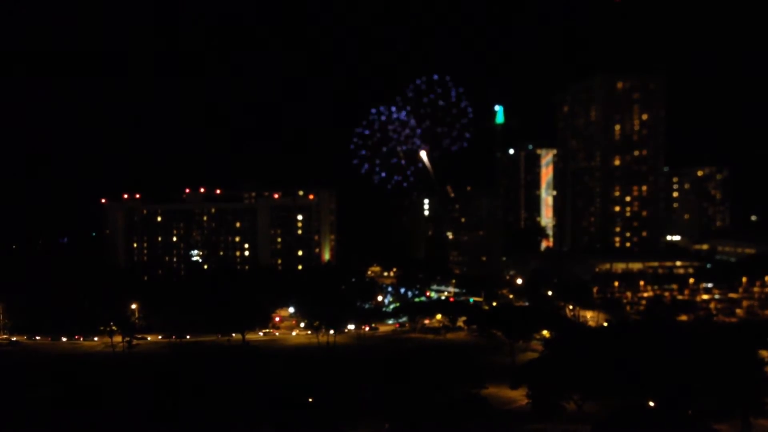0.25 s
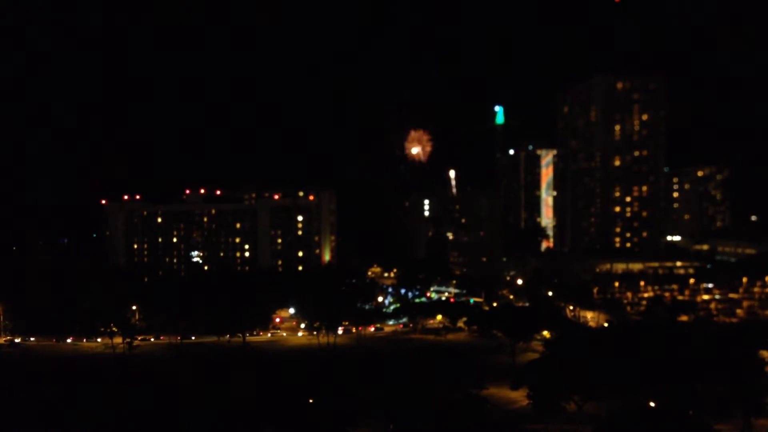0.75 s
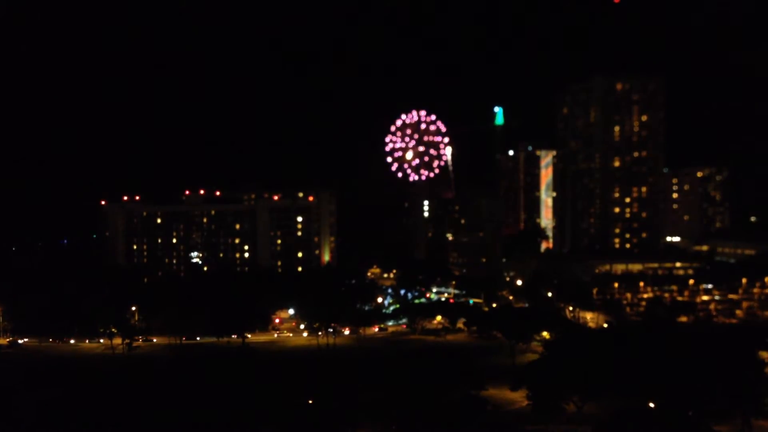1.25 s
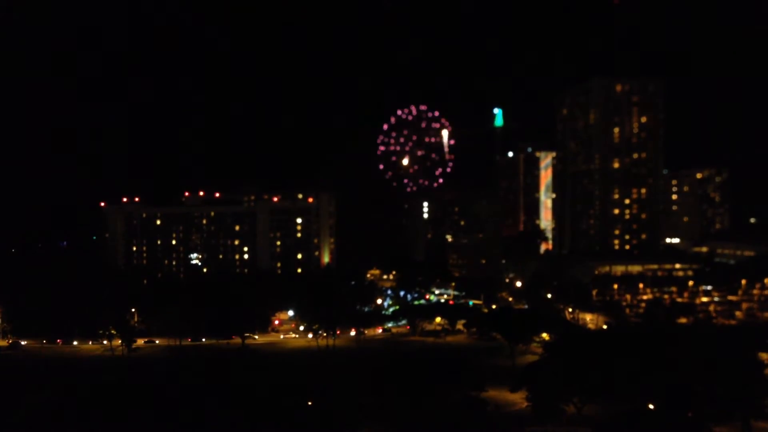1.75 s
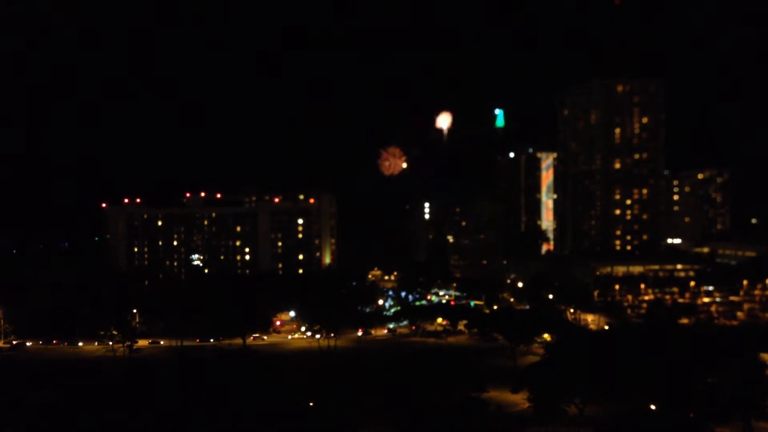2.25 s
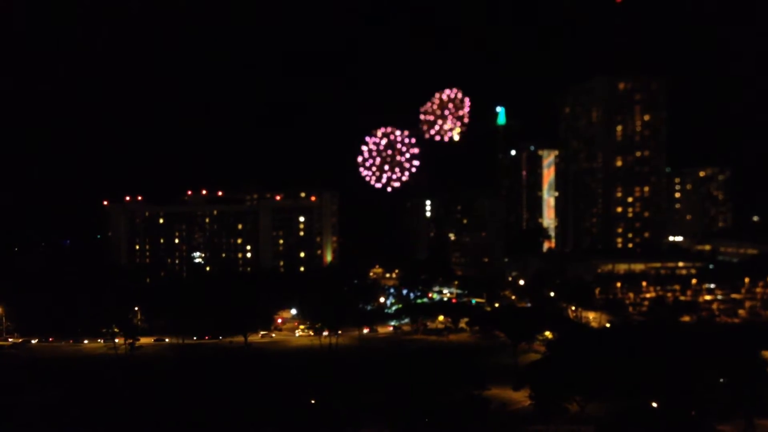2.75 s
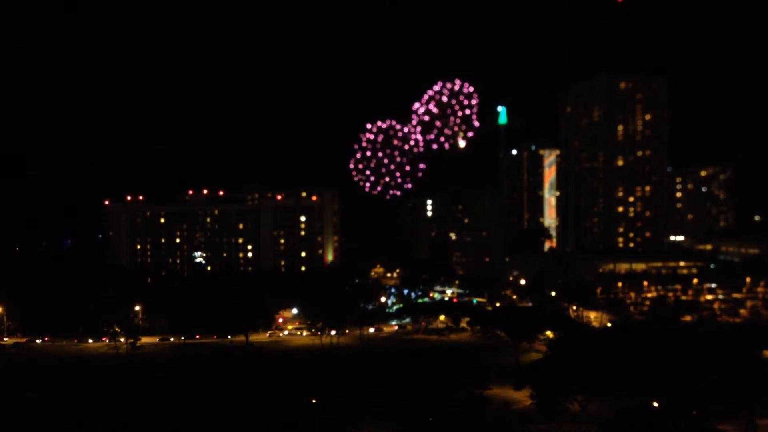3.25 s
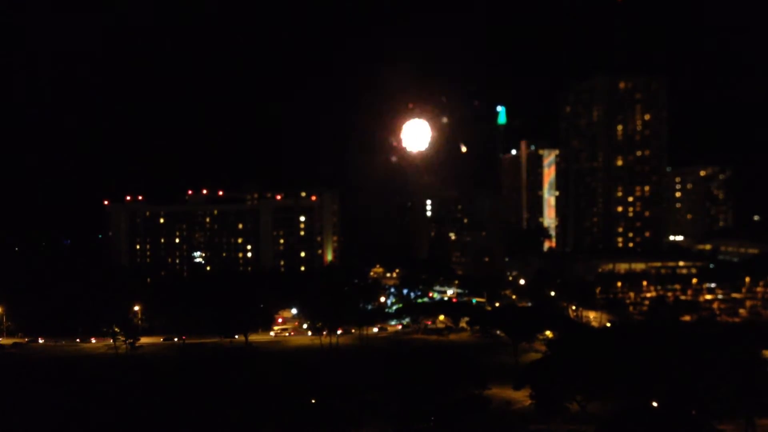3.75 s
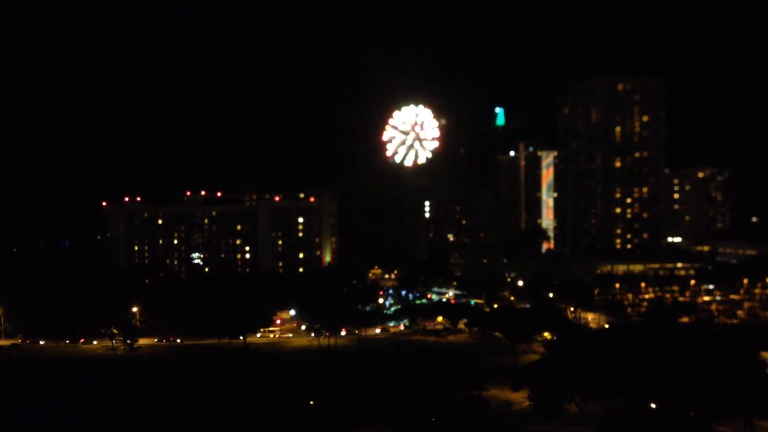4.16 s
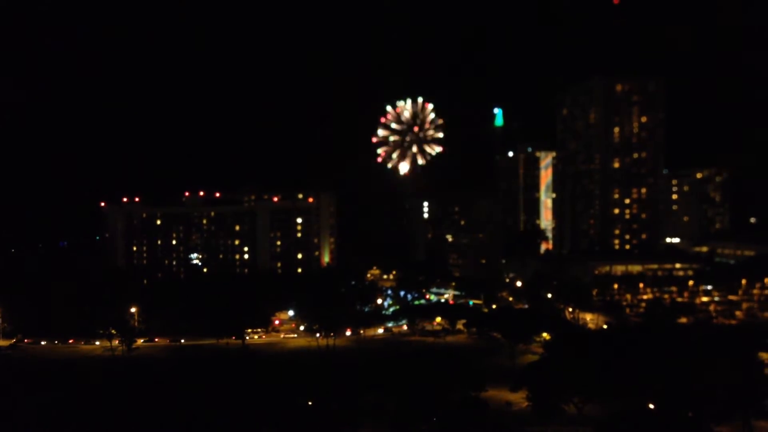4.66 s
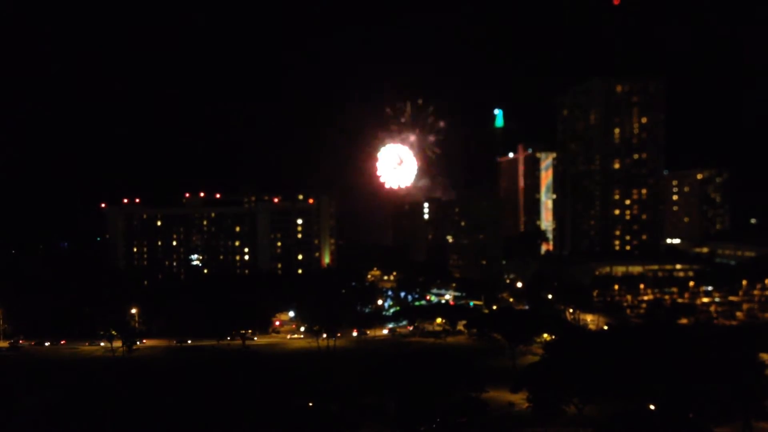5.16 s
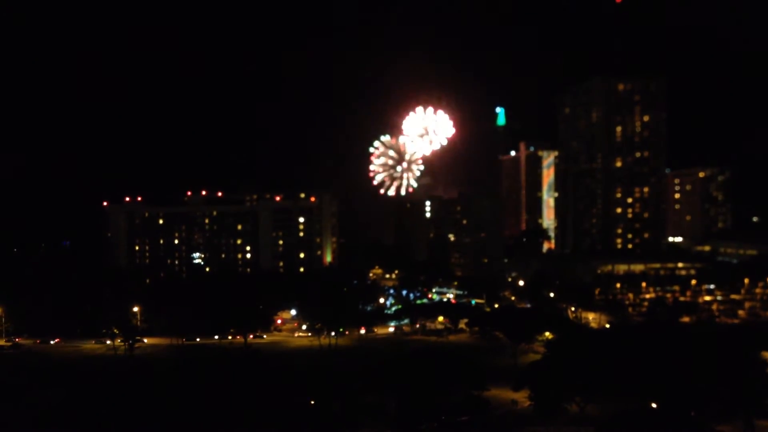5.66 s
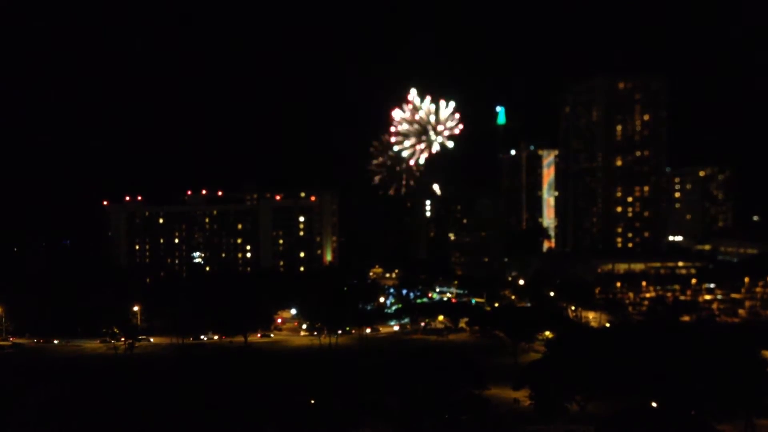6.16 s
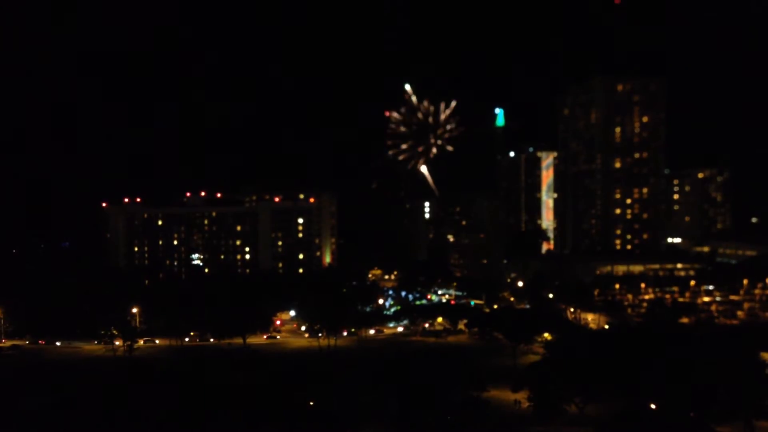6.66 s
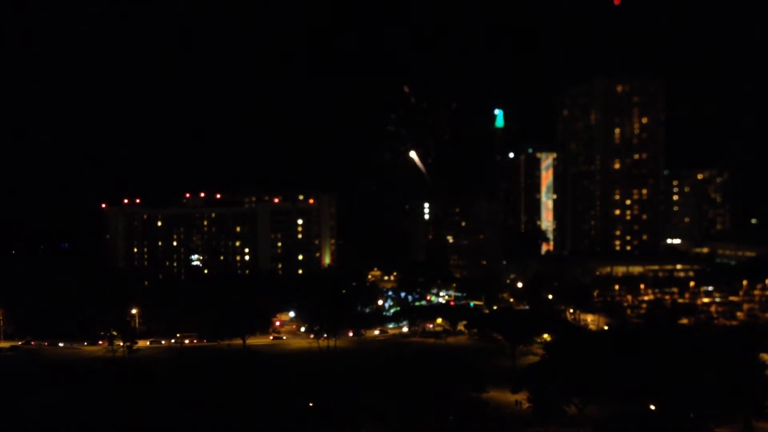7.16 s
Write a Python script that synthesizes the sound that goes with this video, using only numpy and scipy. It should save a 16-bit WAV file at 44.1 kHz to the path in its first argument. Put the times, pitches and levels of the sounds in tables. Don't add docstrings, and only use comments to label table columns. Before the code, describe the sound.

Firework shells explode far across a city at night, heard from a hard-walled balcony. Low rumble, dim traffic and faint hiss run throughout. A deep bang comes first, then a close pair, a lone dry burst, another pair, the loudest boom and a weaker last one. Dull echoes follow from tall buildings.

```python
import sys
import numpy as np
from scipy import signal
from scipy.fft import rfft, irfft, next_fast_len
from scipy.io import wavfile
from scipy.ndimage import uniform_filter1d

SR = 44100
rng = np.random.default_rng(int(sys.argv[2]) if len(sys.argv) > 2 else 0)


def rack_gain(trim_db):
    fader = np.asarray(trim_db, float)
    return 10 ** (fader / 20)


def pcm_store(signal):
    levels = np.round(np.clip(np.atleast_2d(signal), -1, 1) * 32767)
    wavfile.write(sys.argv[1], SR, levels.astype(np.int16).T)


N = 327663

# t/s, level/dB
WASH = [(0.0, -42), (0.25, -43), (1.41, -37.5), (1.51, -32.5), (1.76, -36), (2.29, -34), (2.67, -37),
        (3.08, -36.5), (3.5, -39), (4.47, -38), (4.67, -43), (5.03, -37.5), (5.34, -36), (6.25, -35),
        (6.83, -35.5), (7.26, -34.5), (7.43, -27)]
# f/Hz, density/dB
WASH_LOW = [(29, -70.5), (50, -49.5), (77, -23.5), (108, -13), (136, -9), (183, 3), (219, -2.5),
            (284, -1.5), (330, -14), (398, -14), (420, -16), (550, -65), (920, -120)]
WASH_MIDDLE = [(160, -40), (280, -4), (329, -12.5), (513, -12), (602, -12), (926, -18.5), (1080, -21),
               (1490, -25), (1600, -24.5), (2080, -29), (3520, -120)]
# f/Hz, density/dB
TRAFFIC = [(530, -1), (900, -10.5), (1270, -3.5), (1350, -16.5), (1610, -8), (1750, -5.5), (1900, -4),
           (2980, -7), (3760, -13.5), (4700, -13.5), (5200, -20), (6040, -19.5), (10000, -46.5),
           (13000, -68), (22000, -120)]
MIC_NOISE = [(4120, -26.5), (7000, -11.5), (8780, -15.5), (10500, -22.5), (11800, -23.5), (14600, -21),
             (15500, -23)]
# t/s, drop/dB
GAIN_DROPS = [
    (.495, 5),
    (1.47, 4.5),
    (3.075, 6),
    (4.692, 8),
    (6.085, .8),
]
# t/s, boom/dB, knock/dB, crack/dB, flutter t60/s
BURSTS = [
    (0.4877, -2.5, -9.5, -18.5, 0.11),
    (1.3142, -5, -6.5, -16, 0.18),
    (1.4617, -5.5, -11, -16.5, 0.047),
    (3.0673, -3, -7, -22.5, 0.027),
    (4.6077, -5, -11, -12.5, 0.12),
    (4.6857, -2.5, -9, -22.5, 0.058),
    (6.0757, -1, -10.5, -15.5, 0.099),
    (7.2737, -8.5, -12.5, -16.5, 0.16),
]
# delay/s, level/dB
WALL_BOUNCES = [(.0024, 0.5), (.0072, -14.5), (.0125, -5), (.0175, -20.5), (.023, -15)]
# f/Hz, width/Hz, level/dB
BOOM_MODES = [(174.6, 31.6, 2), (252.4, 58.1, -3)]
# f/Hz, width/Hz, level/dB
KNOCK_MODES = [(353.4, 148, 1.5), (641, 108, 0)]
# f/Hz, width/Hz, level/dB
CRACK_MODES = [(834, 58, 2.5), (1063, 91, 8.5), (1390, 110, -0.5)]
# f/Hz, width/Hz, level/dB
SNAP_MODES = [(1730, 960, -4.5), (2726, 730, 0.5), (3310, 1280, -5.5), (4650, 560, -7.5), (6020, 840, -17)]
# delay/s, boom loss/dB, treble loss/dB
TOWERS = [(.055, -15, -20.5), (.115, -16.5, -22.5), (.186, -25.5, -33), (.348, -26, -26.5)]
# t/s, boom/dB, knock/dB, crack/dB
STRAY_THUDS = [(0.902, -34, -31.5, -55), (1.043, -31, -27, -32), (1.059, -17, -32, -41),
               (2.327, -14.5, -31, -36.5), (2.617, -27, -38, -47), (2.749, -17, -33.5, -48.5),
               (2.865, -32, -52, -56), (3.123, -20, -30, -25), (3.252, -19, -37, -35),
               (3.616, -24.5, -27.5, -37), (4.06, -23, -30, -48), (4.43, -19.5, -39, -50),
               (4.713, -10.5, -33.5, -32), (4.809, -17, -41, -37), (5.576, -20, -24, -38),
               (5.71, -18, -26, -33), (5.935, -25, -51, -61), (6.26, -12.5, -21, -30),
               (6.421, -28, -26.5, -34), (6.63, -35, -31, -34), (6.833, -42, -31, -42),
               (6.982, -13, -22, -46), (6.094, -1.5, -12.5, -21.5), (7.33, -10.5, -19.5, -28),
               (7.357, -12, -18.5, -25), (7.378, -14, -25, -32)]
# t/s, boom/dB, knock/dB, crack/dB
LIFTS = [
    (2.432, -17, -21.5, -38),
    (2.845, -24, -23.5, -32.5),
    (7.069, -16.5, -24, -33.5),
]

MIDDLE_DB, MIDDLE_PER_WASH_DB = -43, 0.58
TRAFFIC_DB, HISS_DB = -54.5, -70.5
FLUTTER_HZ = 192.56
AIR_HZ = 7560
SNAP_DB, SNAP_PER_CRACK_DB = -9, 0.6
THUD_T60_S, LIFT_T60_S = 0.054, 0.03
BANG_LEN = SR // 2


def unit(x):
    return x / np.sqrt(np.mean(x ** 2) + 1e-20)


def peaked(x):
    return x / np.abs(x).max()


def filtered(x, response):
    size = next_fast_len(x.shape[-1] + 8192)
    spectrum = rfft(x, size) * response(np.fft.rfftfreq(size, 1 / SR))
    return irfft(spectrum, size)[..., :x.shape[-1]]


def rush(spectrum, patchy_db):
    z = signal.stft(rng.standard_normal(N + 512), nperseg=512)[2]
    field = uniform_filter1d(rng.standard_normal(z.shape), size=5, axis=0)
    field = uniform_filter1d(field, size=8, axis=1)
    noise = signal.istft(z * rack_gain(patchy_db * unit(field)), nperseg=512)[1][:N]
    f_hz, level_db = np.transpose(spectrum)

    def colour(hz):
        return rack_gain(np.interp(np.log(hz + 1), np.log(f_hz), level_db, -120, -120))

    return unit(filtered(noise, colour))


def duck_db():
    t = np.arange(N) / SR
    return sum(drop_db * (t > s) * np.exp(-np.abs(t - s) / 1.1) for s, drop_db in GAIN_DROPS)


def rumble():
    s, level_db = np.transpose(WASH)
    wash_db = np.interp(np.arange(N) / SR, s, level_db)
    middle_db = MIDDLE_DB + MIDDLE_PER_WASH_DB * (wash_db - wash_db.mean())
    low = rack_gain(wash_db + 1.5) * rush(WASH_LOW, patchy_db=0.26)
    middle = rack_gain(middle_db) * rush(WASH_MIDDLE, patchy_db=1.3)
    traffic = rack_gain(TRAFFIC_DB + 0.5 - 0.39 * duck_db()) * rush(TRAFFIC, patchy_db=1.6)
    return low + middle + traffic


def hiss():
    return rack_gain(HISS_DB + 1.5 - duck_db()) * rush(MIC_NOISE, patchy_db=0.15)


def resonances(modes, hz):
    return sum((-1) ** k * rack_gain(db) * 1j * hz * width / (centre ** 2 - hz ** 2 + 1j * hz * width)
               for k, (centre, width, db) in enumerate(modes))


def wall_arrivals(t60_s):
    trips_s = np.arange(1, 13) / FLUTTER_HZ
    flutter_db = -60 * trips_s / max(t60_s, 0.02)
    bounces = WALL_BOUNCES + list(zip(trips_s - 0.0006, flutter_db))
    arrivals = np.zeros(BANG_LEN)
    arrivals[0] = 1
    for (lag_s, level_db), (slip, gain) in zip(bounces, rng.standard_normal((len(bounces), 2))):
        arrivals[round((lag_s + 0.00015 * slip) * SR)] += rack_gain(level_db + 1.8 * gain)
    return arrivals / np.linalg.norm(arrivals)


def scatter(life_s, shock_s):
    t = np.arange(BANG_LEN) / SR
    rise = 1 - np.exp(-t / (4 * shock_s))
    decay = rack_gain(-60 * t / life_s) + rack_gain(-20 - 60 * t / (6.6 * life_s))
    return rise * decay / np.sqrt(life_s * SR) * rng.standard_normal(BANG_LEN)


def blasts(rows, shock_s, scatter_db, boom_s, lift_db):
    out = np.zeros(N + 2 * SR)
    size = next_fast_len(BANG_LEN + 4096)
    hz = np.fft.rfftfreq(size, 1 / SR)
    shock = 1j * hz / (1 + 2j * np.pi * hz * shock_s) ** 2
    groups = [shock * resonances(modes, hz) for modes in (BOOM_MODES, KNOCK_MODES, CRACK_MODES, SNAP_MODES)]
    for s, boom_db, knock_db, crack_db, t60_s in rows:
        arrivals = wall_arrivals(t60_s)
        levels_db = [boom_db, knock_db, crack_db, SNAP_DB + SNAP_PER_CRACK_DB * crack_db]
        lives_s = [boom_s * t60_s + 0.06, 0.15, 0.22, 0.14]
        mixes_db = [-3, scatter_db - 5.0, scatter_db - 7.5, scatter_db + 2.5]
        bang = np.zeros(BANG_LEN)
        for group, level_db, trim_db, life_s, mix_db in zip(groups, levels_db, lift_db, lives_s, mixes_db):
            drive = arrivals + rack_gain(mix_db) * scatter(life_s, shock_s)
            ring = irfft(rfft(drive, size) * group, size)[:BANG_LEN]
            bang += rack_gain(level_db + trim_db) * peaked(ring)
        out[round(s * SR):][:BANG_LEN] += bang

    def air(f):
        return (1 - (f / AIR_HZ) ** 2 + 1.3j * f / AIR_HZ) ** -3

    return filtered(out[:N], air)


def bursts():
    return blasts(BURSTS, shock_s=0.00036, scatter_db=13.5, boom_s=1.0, lift_db=[0.15, 0.99, 0.18, 3.23])


def thuds():
    rows = [(s + lag_s, boom + low_db, knock + high_db, crack + high_db, THUD_T60_S)
            for s, boom, knock, crack, _ in BURSTS for lag_s, low_db, high_db in TOWERS]
    rows += [(*row, THUD_T60_S) for row in STRAY_THUDS]
    return blasts(rows, shock_s=0.00046, scatter_db=16, boom_s=0.7, lift_db=[-3.0, -2.7, -5.0, -11.5])


def lifts():
    rows = [(*row, LIFT_T60_S) for row in LIFTS]
    return blasts(rows, shock_s=0.0006, scatter_db=3, boom_s=0.5, lift_db=[0, 0, 0, -19])


def scene():
    return (rumble() + hiss() + bursts() + thuds() + lifts())[None]


def top_cut(x):
    return signal.sosfilt(signal.butter(12, 16120, fs=SR, output="sos"), x)


def record(dry):
    x = filtered(dry, lambda hz: (1j * hz / (1j * hz + 80)) ** 2)
    x = x + 0.11 * x * x
    x = x / (1 + np.abs(x / 0.72) ** 24) ** (1 / 24)
    x = x * np.clip((N - np.arange(N)) / 130, 0, 1)
    return top_cut(x)


dry = scene()
out = record(dry)
pcm_store(out)
```